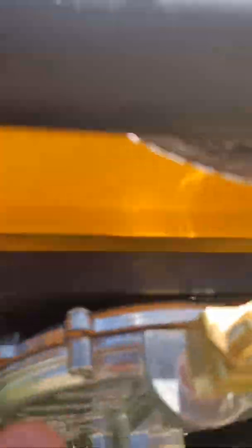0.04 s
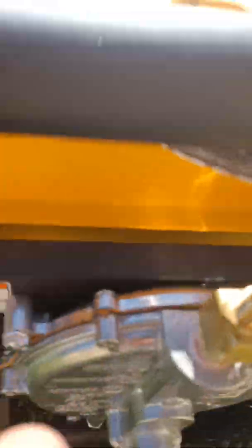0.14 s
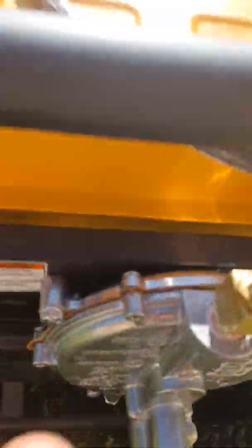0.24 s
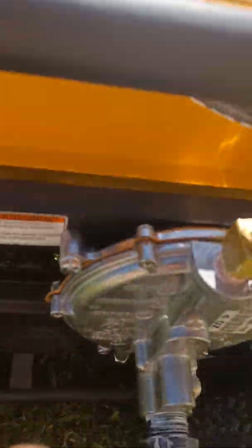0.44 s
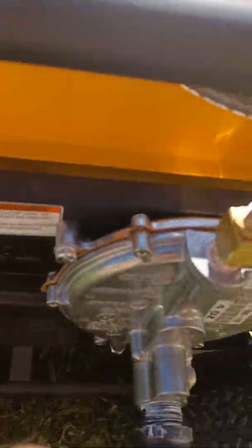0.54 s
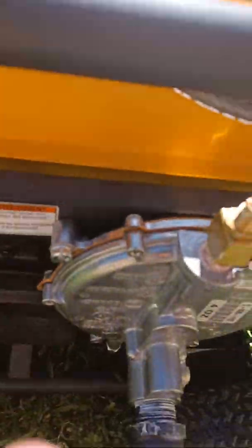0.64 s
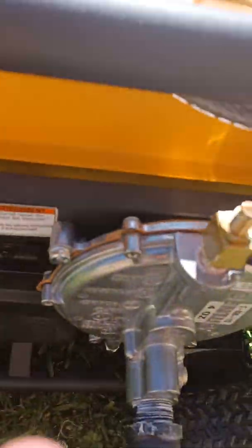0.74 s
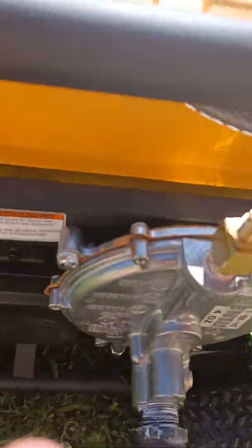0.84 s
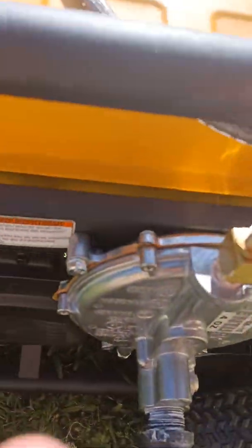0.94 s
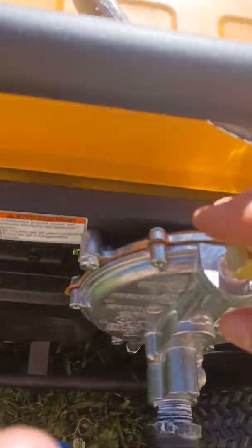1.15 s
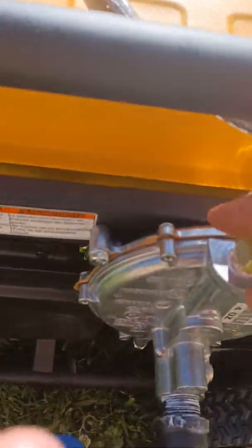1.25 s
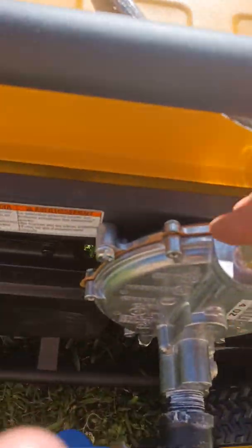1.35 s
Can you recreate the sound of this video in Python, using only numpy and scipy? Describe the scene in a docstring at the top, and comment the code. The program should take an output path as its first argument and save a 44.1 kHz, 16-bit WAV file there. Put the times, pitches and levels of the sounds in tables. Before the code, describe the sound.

Two quick rattling metal knocks on a portable generator, then a soft thud and light tick.

```python
"""Parts of a portable generator are knocked by hand, close by, over a low outdoor rumble and thin air.
First a small metal part snaps and chatters; then the sheet-metal housing takes a rattling knock. Each
impact excites damped normal modes, and the surroundings return a faint tail. A faint swish of rubbing
sets in and the frame settles with a thud. Squeaks, one far bird chirp and two soft handling bumps pass
during the swish. Last come the light tick of a fitting and a clink of loose metal."""
import sys
import numpy as np
from scipy import signal
from scipy.fft import rfft, irfft
from scipy.io import wavfile
from scipy.ndimage import uniform_filter1d

SR = 44100
rng = np.random.default_rng(int(sys.argv[2]) if len(sys.argv) > 2 else 0)


def output_pcm(signal):
    """Save a mono or channel-first signal as 16-bit PCM at the path in sys.argv[1].

    Samples are clipped to [-1, 1] before scaling.
    """
    pcm = np.clip(np.atleast_2d(signal).T, -1, 1) * 32767
    wavfile.write(sys.argv[1], SR, np.round(pcm).astype(np.int16))


N = 61739
T = np.arange(N) / SR


def amp(db):
    """Amplitude ratio: a factor of ten per 20 dB."""
    return 10 ** (np.asarray(db) / 20)


def unit(x):
    """Normalisation to rms 1."""
    return x / np.sqrt(np.mean(x ** 2))


def add(out, x, start_s):
    """Superposition of x on out from a given time."""
    i = int(np.clip(start_s * SR, 0, N - 1))
    n = min(len(x), N - i)
    out[i:i + n] += x[:n]


def noise(spectrum, size=65536):
    """Spectral shaping: white noise takes on a given spectrum, at rms 1."""
    hz, db = np.array(spectrum, float).T
    f = np.maximum(np.fft.rfftfreq(size, 1 / SR), 1)
    gain = amp(np.interp(np.log(f), np.log(hz), db))
    gain /= np.sqrt(1 + (hz[0] / 2 / f) ** 4)  # roll-off below the lowest point
    return unit(irfft(rfft(rng.standard_normal(size)) * gain))


def fade(x, t60, damping, octaves=9):
    """Frequency-dependent damping: t60 [s] holds at 1 kHz, and higher octaves decay faster."""
    t = np.arange(len(x)) / SR
    f = np.maximum(np.fft.rfftfreq(len(x), 1 / SR), 1)
    octave = np.clip(np.log2(f / 62.5), 0, octaves - 1)
    spectrum, out = rfft(x), 0
    for k in range(octaves):
        band = irfft(spectrum * np.maximum(1 - abs(octave - k), 0))
        khz = max(2. ** (k - 4), .5)
        out += band * np.exp(-np.log(1000) * t * khz ** damping / t60)
    return out


def strike(blows, modes, spectrum, clatter_db, crack_db, crack_s, t60, damping, size=32768):
    """Impact excitation: a brief crack, a clatter of dense weak modes and the ring of the strong ones."""
    out, t = np.zeros(N), np.arange(size) / SR
    ring = sum(amp(db) * np.sin(2 * np.pi * hz * t) * np.exp(-np.log(1000) * t / mode_t60)
               for hz, db, mode_t60 in modes)
    for start, db, cutoff_hz, ring_db in blows:
        crack = amp(crack_db) * noise(spectrum, size) * np.exp(-(t / crack_s) ** 2)
        clatter = amp(clatter_db) * fade(noise(spectrum, size), t60, damping)
        contact = signal.butter(2, cutoff_hz, fs=SR, output="sos")  # softer contact, less treble
        add(out, amp(db) * signal.sosfilt(contact, amp(ring_db) * ring + clatter + crack), start)
    return out


def glide(peak_s, hz, db, half_width_s, hz_per_s, waver_rms_hz=46.2):
    """Frequency modulation: a tone slides and wavers under a Gaussian envelope."""
    t = T - peak_s
    waver = waver_rms_hz * unit(uniform_filter1d(rng.standard_normal(N), size=300))
    phase = 2 * np.pi * np.cumsum(hz + hz_per_s * t + waver) / SR
    return amp(db) * np.sin(phase) * np.exp(-(t / half_width_s) ** 2)


# Spectrum of the outdoor background (frequency [Hz], relative density [dB])
AIR_SPECTRUM = [(15, -16), (25, -5.5), (130, 0), (293, -23), (344, -33), (754, -36), (1610, -40.5),
                (2550, -49.5), (3250, -48.5), (4370, -52.5), (8140, -54), (10700, -57.5), (16000, -66)]
# Envelope of the rumble (time [s], level [dB])
RUMBLE_ENVELOPE = [(0, -45.5), (0.251, -44.5), (.55, -43.5), (.75, -45), (.88, -47), (1.05, -43),
                   (1.19, -40), (1.32, -47), (1.4, -46.5)]


def outdoors():
    """Ambient noise: the band below 280 Hz swells slowly under steady thin air."""
    air = noise(AIR_SPECTRUM)[:N]
    rumble = signal.sosfiltfilt(signal.butter(2, 280, fs=SR, output="sos"), air)
    times, db = np.array(RUMBLE_ENVELOPE).T
    return rumble * amp(np.interp(T, times, db)) + (air - rumble) * amp(-47)


# Impacts of the small part (time [s], level [dB], contact cutoff [Hz], ring gain [dB])
PART_IMPACTS = [(.2316, -22.5, 13900, -6.5), (.2445, -29.5, 14000, -13.5), (.2570, -28.5, 12110, -12.5),
                (.2655, -29, 5000, -13.5), (.2810, -31.5, 3000, -13)]
# Its strong modes (frequency [Hz], relative level [dB], T60 [s])
PART_MODES = [(208, -2, 0.43), (277, -6.5, 0.2), (691, -11, .35), (775, -12.5, .3), (1414, -3, 0.38),
              (1496, -6.5, .42), (1810, -8, 0.38), (1791, -2.5, 0.49), (1889, -8.5, .41), (1955, -13, 0.36),
              (2037, -7, 0.29), (2857, -25, 0.25), (3026, 0, 0.18), (3110, -7.5, .3), (3580, -7, 0.24),
              (5330, -17.5, .2), (5529, -12.5, 0.31), (6590, -19.5, .18), (8400, -25.5, .14)]
# Its crack and clatter (frequency [Hz], relative density [dB])
PART_SPECTRUM = [(80, -14.5), (220, -1.5), (480, -15.5), (760, -9.5), (960, -20), (1220, -17.5), (1500, -3),
                 (2000, 0), (2600, -17), (3150, -4), (4600, -21.5), (5600, -16), (6600, -14.5), (7600, -27),
                 (9000, -19), (10500, -39), (15500, -30)]


def part_snaps():
    """Repeated impact: a small metal part is excited again while it still rings, and chatters."""
    return strike(PART_IMPACTS, PART_MODES, PART_SPECTRUM,
                  clatter_db=1, crack_db=0, crack_s=0.0068, t60=0.34, damping=0.43)


# Impacts on the housing (time [s], level [dB], contact cutoff [Hz], ring gain [dB])
HOUSING_IMPACTS = [(.3630, -23.5, 6020, -6), (.3793, -20.5, 7650, -1), (.3814, -23.5, 7000, -10.5),
                   (.3877, -22.5, 19000, -23), (.3845, -30, 14000, -18.5), (.3965, -31, 9000, -14.5),
                   (.4140, -27, 1500, -10), (.4350, -22.5, 1320, -1.5), (.4430, -27, 1500, -5.5)]
# Its strong modes (frequency [Hz], relative level [dB], T60 [s])
HOUSING_MODES = [(319.2, -9, 0.45), (444, -11, 0.34), (497, -6.5, .34), (642, -5, 0.46), (686.4, -1, 0.53),
                 (752.6, -11, .5), (767, -3.5, 0.49), (793.5, -6.5, 0.45), (881.5, -9, 0.65),
                 (949, -9, 0.15), (1148, -5, 0.2), (1365.2, -4, 0.43), (1424, -11.5, 0.64), (1834, -28, .3),
                 (2004, -7, 0.48), (1946, -12.5, 0.27), (2357, -12, 0.61), (2690, -8.5, .17),
                 (2809, 5.5, 0.14), (4175, -13, .18)]
# Its crack and clatter (frequency [Hz], relative density [dB])
HOUSING_SPECTRUM = [(70, -24.5), (180, 4.5), (350, -8.5), (720, 2), (1100, -2), (2000, 3), (3000, -2.5),
                    (4200, -10), (5200, -16.5), (6500, -15), (7800, -28), (9600, -18.5), (11000, -37.5),
                    (15000, -28)]


def housing_knock():
    """Plate vibration: a rattle of blows excites the inharmonic modes of the sheet metal."""
    return strike(HOUSING_IMPACTS, HOUSING_MODES, HOUSING_SPECTRUM,
                  clatter_db=-1.5, crack_db=7, crack_s=0.0038, t60=0.45, damping=0.34)


# Envelope of the rubbing (time [s], level [dB])
SWISH_ENVELOPE = [(.50, -81), (0.577, -62), (.61, -95), (.72, -71), (.78, -67), (.90, -68), (.99, -62.5),
                  (1.05, -80), (1.12, -92)]
# Its spectrum (frequency [Hz], relative density [dB])
SWISH_SPECTRUM = [(1500, 5.5), (2600, -10), (3350, 0.5), (4300, -20), (5400, -6.5), (6000, -4), (7200, -13),
                  (8000, -0.5), (9800, 4), (10500, -42), (15500, -21)]


def swish(flicker_rms_db=1.5):
    """Friction noise: rubbing gives a faint high swish whose level flickers."""
    times, db = np.array(SWISH_ENVELOPE).T
    flicker_db = flicker_rms_db * unit(uniform_filter1d(rng.standard_normal(N), size=900))
    rubbing = (T > times[0]) & (T < times[-1])
    return noise(SWISH_SPECTRUM)[:N] * amp(np.interp(T, times, db) + flicker_db) * rubbing


# Impacts of the settling frame (time [s], level [dB], contact cutoff [Hz], ring gain [dB])
FRAME_IMPACTS = [(.5600, -40.5, 1850, -15.5), (.5680, -33, 1300, -5), (.5860, -38.5, 950, 2)]
# Its strong modes (frequency [Hz], relative level [dB], T60 [s])
FRAME_MODES = [(202, 5.5, 0.21), (499, 1, 0.37), (605.5, -7, 0.23), (693, 5, 0.24), (928, -4, 0.23)]
# Its crack and clatter (frequency [Hz], relative density [dB])
FRAME_SPECTRUM = [(80, -15), (200, 1), (350, -2.5), (520, -0.5), (900, -1), (1500, -6.5), (2800, -12),
                  (5000, -22), (12000, -49)]


def frame_thud():
    """Soft contact acts as a low-pass filter: the frame settles with a dull thud."""
    return strike(FRAME_IMPACTS, FRAME_MODES, FRAME_SPECTRUM,
                  clatter_db=-3.5, crack_db=6.5, crack_s=0.0095, t60=0.47, damping=0.069)


# Squeaks in the swish (time [s], frequency [Hz], level [dB], half-width [s], glide [Hz/s])
SQUEAK_TONES = [(0.564, 5800, -64, 0.025, -2), (0.827, 9030, -62, 0.0095, 40001.5),
                (0.871, 5980, -64.5, 0.019, 2998.5), (0.943, 8000, -60, 0.02, 15999),
                (.985, 6010, -62, 0.028, 3), (0.999, 9700, -68, 0.024, 20006)]


def squeaks():
    """Friction tones: a few thin, clear squeaks stand out of the rubbing."""
    return sum(glide(*tone) for tone in SQUEAK_TONES)


def bird_chirp():
    """A falling frequency sweep: one brief call from a far bird."""
    return glide(peak_s=.698, hz=3760, db=-55.5, half_width_s=0.0084, hz_per_s=-6000)


def whistles(count=30, from_s=.72, to_s=1.05, low_hz=7500, high_hz=15200):
    """Random frequency sweeps: weak whistles dot the swish, the higher ones fainter."""
    out = np.zeros(N)
    for when, pitch, slope in rng.random((count, 3)):
        height = pitch ** 2  # favours the low end
        out += glide(from_s + (to_s - from_s) * when, low_hz + (high_hz - low_hz) * height,
                     db=-73 - 5 * height, half_width_s=.017, hz_per_s=14000 * (2 * slope - 1))
    return out


# Handling bumps (time [s], level [dB], half-width [s])
BUMP_PULSES = [(1, -59.5, 0.037), (1.054, -62.5, 0.046)]


def bumps():
    """Amplitude modulation: smooth pulses of dull noise make the soft bumps of handling."""
    envelope = sum(amp(db) * np.exp(-((T - peak) / width) ** 2) for peak, db, width in BUMP_PULSES)
    spectrum_hz_db = [(200, -14), (380, 9.5), (750, -8.5), (1700, -19), (4000, -25), (12000, -65)]
    return envelope * noise(spectrum_hz_db)[:N]


# Impacts of the fitting (time [s], level [dB], contact cutoff [Hz], ring gain [dB])
FITTING_IMPACTS = [(1.1384, -54, 8820, -15), (1.1420, -44.5, 6940, -1)]
# Its strong modes (frequency [Hz], relative level [dB], T60 [s])
FITTING_MODES = [(790, -11, 0.37), (1020, -21, 0.76), (1494, -13, 0.47), (1720, 3, 0.23), (1890, -4, 0.47),
                 (2060, -7, 0.26), (2900, 3, 0.11), (3580, -6, 0.054), (4300, -15, .22), (4460, -4.5, 0.12),
                 (5600, -6, 0.12), (9300, -24, 0.16)]
# Crack and clatter of both tick and clink (frequency [Hz], relative density [dB])
LIGHT_METAL_SPECTRUM = [(200, -13), (600, -12), (1200, -22), (1600, 4.5), (3000, 4), (4600, 1),
                        (5800, -6.5), (7000, -15), (9500, -17.5), (11500, -53)]
# The fitting's closely spaced modes (frequency [Hz], relative density [dB])
BEATING_SPECTRUM = [(1350, -15), (1520, -6), (1620, -16), (1760, -1.5), (1880, 1), (2000, -5.5),
                    (2200, -28), (3000, -61)]


def fitting_tick(beating_db=-45, beating_t60=.48):
    """Beating: after a light tick, closely spaced modes interfere as they decay."""
    tick = strike(FITTING_IMPACTS, FITTING_MODES, LIGHT_METAL_SPECTRUM,
                  clatter_db=-6, crack_db=10, crack_s=0.0059, t60=0.54, damping=1.0)
    beating = noise(BEATING_SPECTRUM)[:N] * np.exp(-np.log(1000) * T / beating_t60)
    add(tick, amp(beating_db) * beating, start_s=FITTING_IMPACTS[-1][0])
    return tick


# Impact of loose metal (time [s], level [dB], contact cutoff [Hz], ring gain [dB])
CLINK_IMPACTS = [(1.3868, -56.5, 4530, 16)]
# Its strong modes (frequency [Hz], relative level [dB], T60 [s])
CLINK_MODES = [(1533, -11, 0.32), (2310, -7, 0.13), (2920, 2.5, 0.026), (3500, -12.5, 0.041),
               (3700, -3.5, .03), (4630, -18.5, 0.092), (9330, -13, 0.14)]


def metal_clink():
    """Free vibration: loose metal, struck once, rings in high, short-lived modes."""
    return strike(CLINK_IMPACTS, CLINK_MODES, LIGHT_METAL_SPECTRUM,
                  clatter_db=4.5, crack_db=-5, crack_s=0.0023, t60=0.12, damping=1.0)


def reflections(x, db=-21):
    """Reverberation: convolution with decaying noise gives the faint tail of the surroundings."""
    tail = fade(rng.standard_normal(32768), t60=0.48, damping=0.24)
    tail[:SR // 50] = 0  # the first reflection arrives after 20 ms
    tail /= np.sqrt(np.sum(tail ** 2))
    return amp(db) * signal.fftconvolve(x, tail)[:N]


def scene():
    """Superposition at one microphone; the metal parts radiate poorly below 94 Hz."""
    vibration = part_snaps() + housing_knock() + frame_thud() + fitting_tick() + metal_clink()
    knocks = signal.sosfilt(signal.butter(2, 94, "high", fs=SR, output="sos"), vibration)
    tail = reflections(knocks)
    handling = swish() + bumps() + whistles() + squeaks()
    return (knocks + tail + handling + outdoors() + bird_chirp())[None]


def record(dry, low_hz=38, top_hz=15900):
    """Band limiting: filters remove the deepest bass and the highest treble."""
    dry = signal.sosfilt(signal.butter(4, low_hz, "high", fs=SR, output="sos"), dry)
    return signal.sosfilt(signal.ellip(10, .2, 80, top_hz, fs=SR, output="sos"), dry)


dry = scene()
out = record(dry)
output_pcm(out)
```